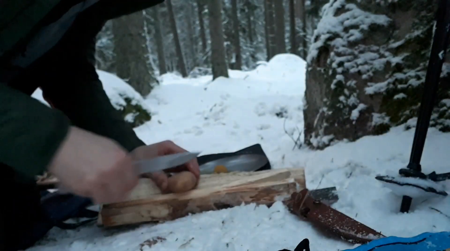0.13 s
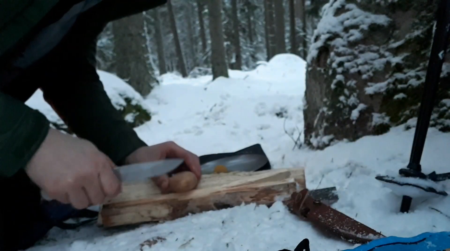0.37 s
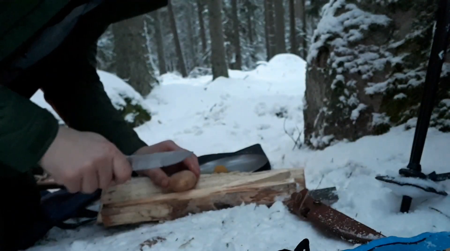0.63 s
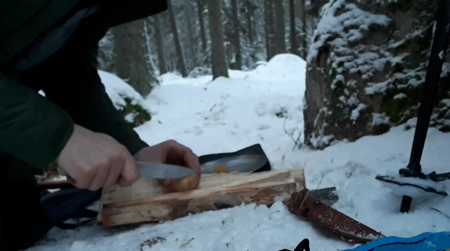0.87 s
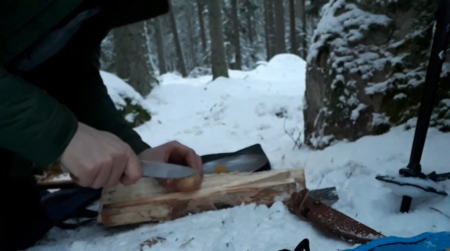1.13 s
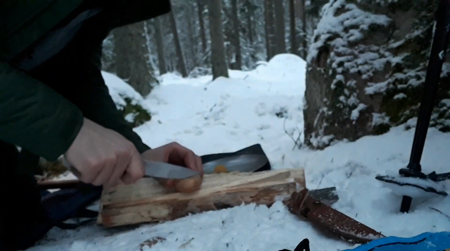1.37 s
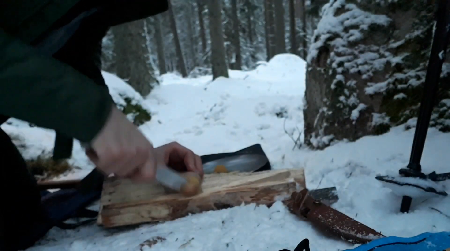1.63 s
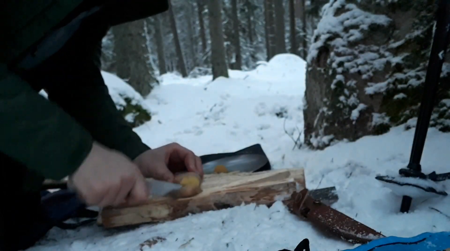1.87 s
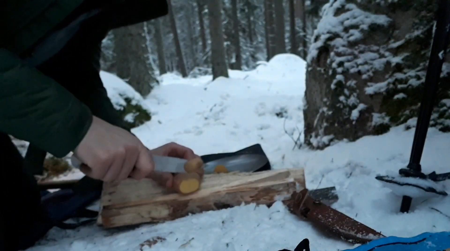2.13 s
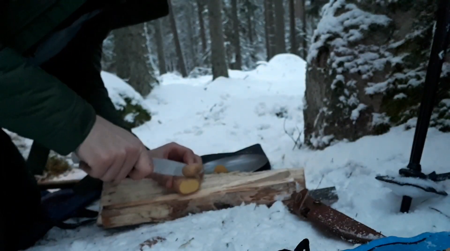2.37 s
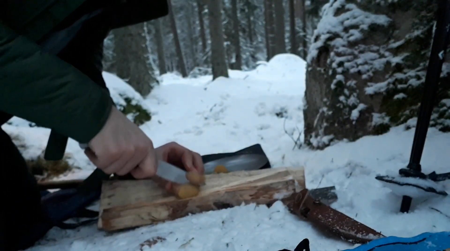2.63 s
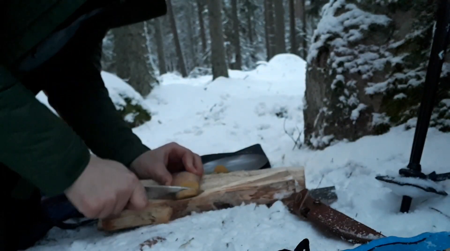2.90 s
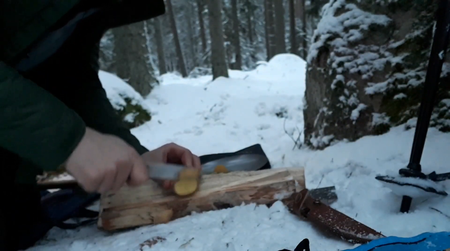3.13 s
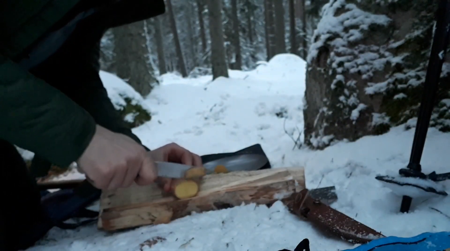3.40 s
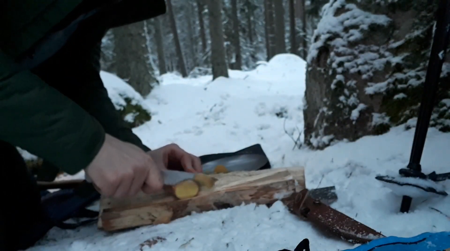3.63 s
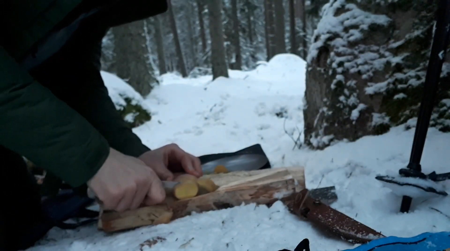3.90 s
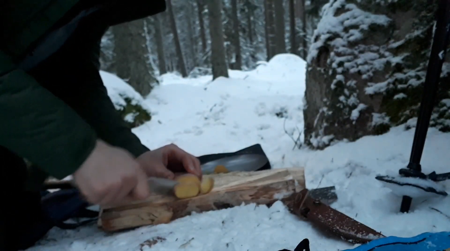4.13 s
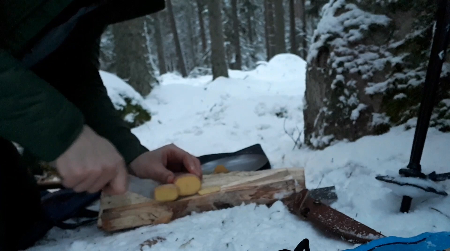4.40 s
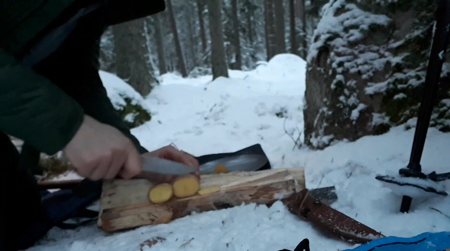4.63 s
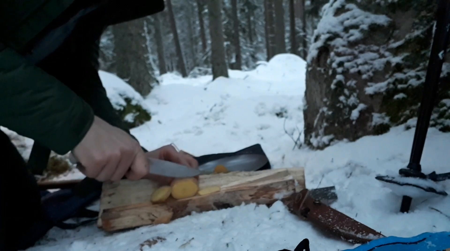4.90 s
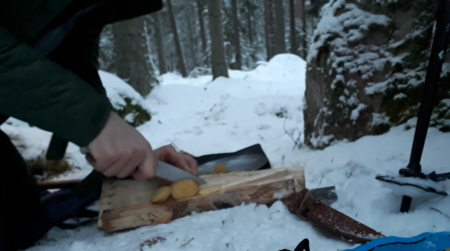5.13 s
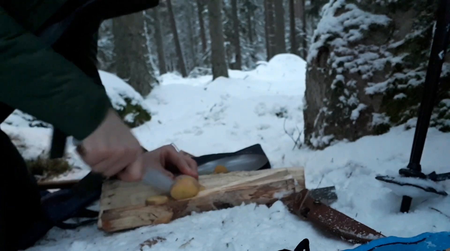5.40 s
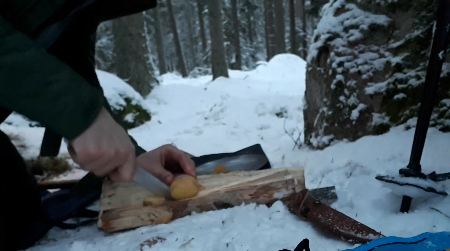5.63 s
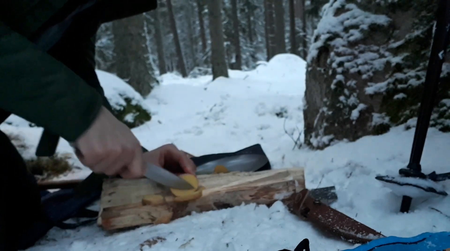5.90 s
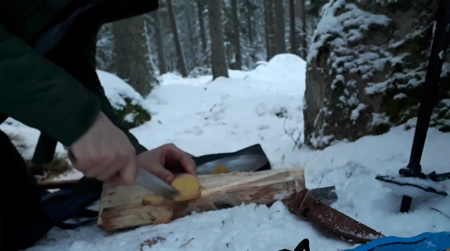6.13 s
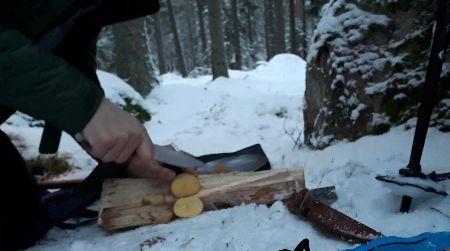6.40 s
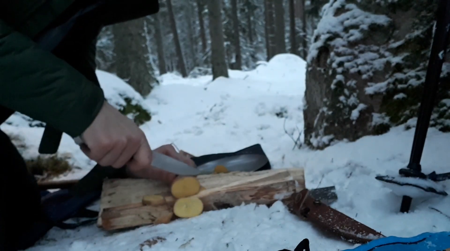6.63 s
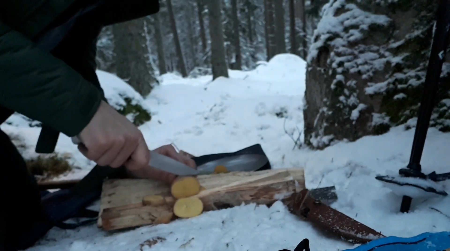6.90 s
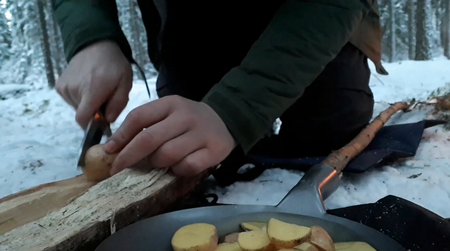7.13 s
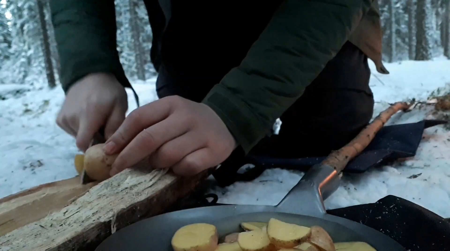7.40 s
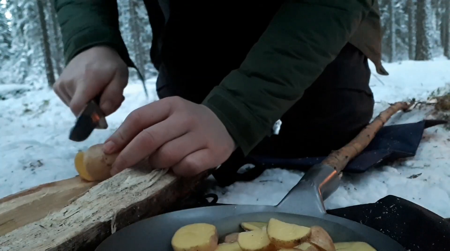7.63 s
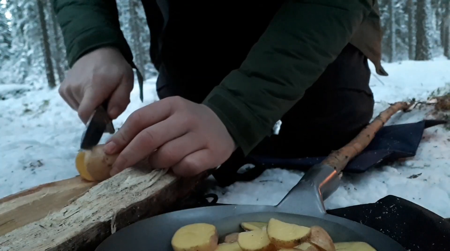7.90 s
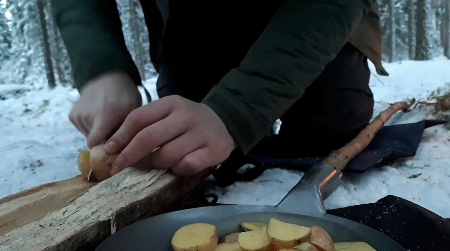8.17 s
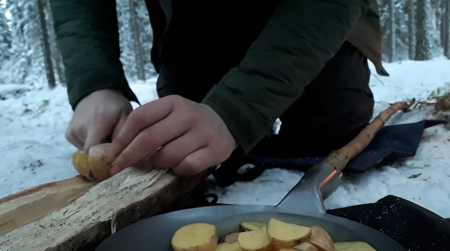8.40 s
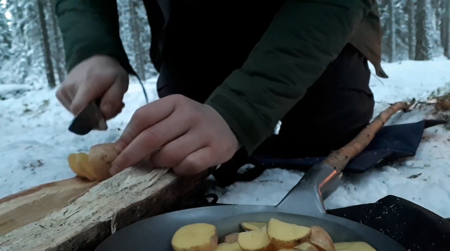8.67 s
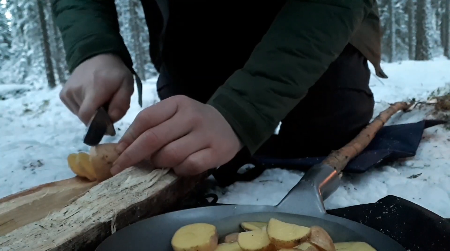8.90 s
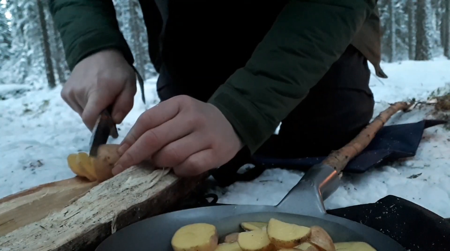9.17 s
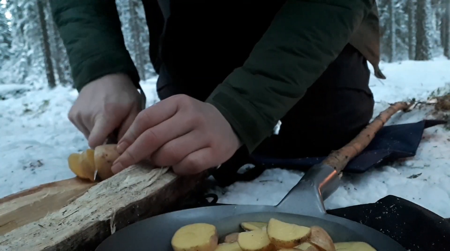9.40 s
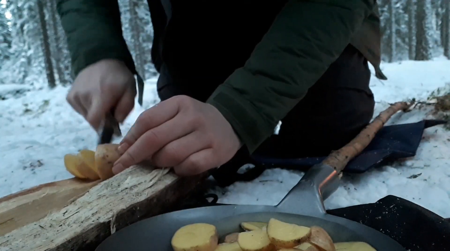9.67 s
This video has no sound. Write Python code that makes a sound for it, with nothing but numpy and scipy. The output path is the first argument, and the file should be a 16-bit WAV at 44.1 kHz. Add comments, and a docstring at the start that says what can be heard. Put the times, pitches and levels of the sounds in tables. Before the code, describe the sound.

A knife slices potatoes with wet crunches and sharp knocks on a split log outdoors, while a nearby wood fire pops, one crack very loud.

```python
"""A snowy forest: a knife slices potatoes on a split log; a wood fire pops and, from a nearer stand, hisses.
Wet cutting and a first sleeve rustle are grainy noise, edge ticks and fire pops are bursts ringing the open
port, knocks ring log modes. The left microphone port is open and hears all this through the air; the right
port is blocked: it hears mostly thuds and rumble, sums of ground modes, that come up through the ground into
the camera body. Low still air and a smooth microphone hiss lie under it all."""
import sys
import numpy as np
from scipy import signal
from scipy.fft import rfft, irfft
from scipy.io import wavfile
from scipy.ndimage import uniform_filter1d

SR = 44100
rng = np.random.default_rng(int(sys.argv[2]) if len(sys.argv) > 2 else 0)


def master_out(mix):
    """Clip the mix to full scale and print it as 16-bit PCM to the path in sys.argv[1]."""
    frames = np.transpose(np.atleast_2d(mix))
    ceiling = np.clip(frames, -1, 1)
    pcm = np.round(ceiling * 32767).astype(np.int16)
    wavfile.write(sys.argv[1], SR, pcm)


def how_loud(loudness_db):
    """Turn decibels into a plain amplitude multiplier (0 dB gives 1, 20 dB gives 10)."""
    steps = np.asarray(loudness_db, float) / 20
    return 10 ** steps


N = 431298
MOVE_S = 7.08  # the camera is set down nearer the fire

# modes of log, snow and camera stand, far stand:
# (f/Hz, relative level/dB, t60/s before damping, arrival/ms before slowness)
GROUND_FAR = [(77.7, -4, 0.152, 26.4), (106.1, 3, 0.11, 23.75), (156.1, 6.5, 0.065, 14.23),
              (216.5, -4, 0.049, 12.92), (540, -25, 0.038, 6.6)]


def evened(x):
    """Scales to rms 1."""
    return x / np.sqrt(np.mean(x ** 2) + 1e-20)


def read(points, hz):
    """Reads a spectrum on a log-frequency axis."""
    f, value = np.transpose(points)
    return np.interp(np.log(hz + 1), np.log(f + 1), value)


def add(mix, s, sound):
    """Adds a sound at time s."""
    part = mix[..., round(s * SR):][..., :sound.shape[-1]]
    part += sound[..., :part.shape[-1]]


def causal(x, gain):
    """Filters by a gain curve with minimum phase, via the folded cepstrum."""
    size = 2 * (len(gain) - 1)
    cepstrum = irfft(np.log(gain + 1e-5), size)
    cepstrum[1:size // 2] *= 2
    cepstrum[size // 2 + 1:] = 0
    return irfft(rfft(x, size) * np.exp(rfft(cepstrum)), size)


def port(hz):
    """Gain of the open port: the root of its summed resonances."""
    # port resonances: (f/Hz, width/Hz, level in the sum as 20 log/dB)
    resonances = [(1300, 1500, 5.5), (2810, 200, -3.5), (3850, 1700, 2), (5870, 1200, -3), (7600, 950, 2.5),
                  (9740, 770, -3.5), (12380, 1700, -1), (12900, 670, -8), (14300, 420, 2)]
    return np.sqrt(sum(how_loud(db) / (1 + (2 * (hz - f) / width) ** 2) for f, width, db in resonances))


def noise(gain, patchy_db, channels=1):
    """Random short-time spectra with a colour and drifting patches, at rms 1."""
    frames = N // 128 + 5
    a, b, patches = rng.standard_normal((frames, len(gain), channels, 3)).T
    patches = uniform_filter1d(patches, 14, axis=1)  # bins
    patches = evened(uniform_filter1d(patches, 12, axis=2))  # frames
    z = (a + 1j * b) * gain[:, None] * how_loud(patchy_db * patches)
    return evened(signal.istft(z, nperseg=512, noverlap=384)[1][:, :N])


def forest_air():
    """A low murmur of still air: coloured noise partly shared by both ports."""
    # still air: (f/Hz, relative level/dB)
    air_colour = [(20, -16), (50, -2.5), (100, 4.5), (160, -8.5), (260, -17.5), (500, -36)]
    level_db, same = -68, 0.42
    hz = np.fft.rfftfreq(N, 1 / SR)
    gain = how_loud(read(air_colour, hz)) * (hz < 1500)
    a, b = evened(irfft(rfft(rng.standard_normal((N, 2)).T) * gain, N))
    return how_loud(level_db) * np.array([a, same * a + np.sqrt(1 - same ** 2) * b])


def rumble():
    """Restless small pushes at random ring the low ground modes; their level follows the weight on the log."""
    # hands leaning on the log and steps of weight: (t/s, right port rms level/dB)
    weight = [(0.0, -62.5), (0.22, -74), (3.51, -67), (3.6, -56), (5.04, -74), (5.28, -43.5), (5.66, -77),
              (6.15, -55), (6.35, -86), (8.2, -52), (8.5, -70), (9.78, -57)]
    pushes_per_s, rise_s = 70, 0.015
    pushes = rng.standard_normal((N, 2)).T * (rng.random((N, 2)).T < pushes_per_s / SR)
    t = np.arange(8000) / SR
    ring = 0
    for hz, mode_db, t60, _ in GROUND_FAR[:4]:
        ring = ring + how_loud(mode_db - 60 * t / t60) * np.sin(2 * np.pi * hz * t)
    ring = ring * (1 - np.exp(-t / rise_s))
    a, b = evened(signal.fftconvolve(pushes, ring[None], axes=1)[:, :N])
    both = np.array([how_loud(-3.5) * (0.64 * b + 0.74 * a), b])
    s, db = np.transpose(weight)
    return both * how_loud(np.interp(np.arange(N) / SR, s, db))


def strokes():
    """Wet tearing of cells, after a sleeve rustle: grainy noise in three ranges that follow each stroke."""
    # the blade tears or drags; the first row is a sleeve rustle: (peak t/s, mid level/dB,
    # time to swell 20 dB/ms, time to fade 20 dB/ms, treble re mid/dB, wet low part re mid/dB)
    stroke_rows = [(0.11, -62, 150, 301.5, -1.5, 1), (1.523, -66.5, 2, 200, -6, 6),
                   (1.63, -61, 196, 100, 1.5, -8), (1.675, -44, 30, 28, 4, 2),
                   (1.7, -63, 60, 80, 1.5, 10.5), (1.75, -59.5, 100, 138.5, 0, -2),
                   (2.478, -76.5, 30, 400, 2, -7), (2.63, -61.5, 80, 40, -3, -9),
                   (2.65, -46, 16, 49, -5, -3), (2.682, -49, 58.5, 12.5, -0.5, -9),
                   (2.768, -45, 64, 45, -2.5, -9.5), (2.81, -69.5, 50, 300, -6, 2.5),
                   (3.65, -67, 152, 60, -3, -6), (3.686, -47.5, 31, 50, -2, -2.5),
                   (3.76, -46, 96, 44, -0.5, -6.5), (3.92, -62, 10, 45, 2.5, -9),
                   (4.01, -66, 300, 130, -4, -4.5), (4.186, -51.5, 57, 55, -4, -7),
                   (4.25, -71, 60, 1500, -6, -1), (5.074, -60, 10, 600, -6, -7),
                   (5.213, -53.5, 70, 74, 6, -17), (5.257, -48, 82, 21, -4, 3.5),
                   (5.366, -61.5, 69, 150, -4, -5), (5.46, -51.5, 34, 55, -2, -6.5),
                   (5.994, -54.5, 55, 61, -13, -5), (6.156, -56.5, 128, 60, -4, 1.5),
                   (7.234, -53.5, 127, 191, 3, -3), (7.317, -69, 60, 130, -6, -2),
                   (7.415, -72, 80, 60, -5, -8), (7.918, -67, 28, 900, -1, -3),
                   (8.125, -58, 96, 197, 1, -4.5), (8.178, -42.5, 45, 23, -1.5, -6),
                   (8.21, -61, 40, 258, 3.5, -0.5), (9.033, -59, 18, 35, -10, -2),
                   (9.076, -55, 9, 33, -8, 1), (9.123, -59.5, 39, 60, -2.5, -2.5),
                   (9.17, -68.5, 100, 600, -1.5, -3), (9.275, -52.5, 50, 100, 5, -12),
                   (9.307, -46, 60, 78, -2.5, -1), (9.478, -59, 55.5, 201.5, -2, -21),
                   (9.536, -55, 89, 97, -7, 1)]
    hz = np.fft.rfftfreq(512, 1 / SR)
    high = 1 / (1 + (9800 / (hz + 1)) ** 12)
    low = 1 / (1 + (hz / 4500) ** 8)
    low *= 1 + 1 / (1 + ((hz - 2750) / 300) ** 4)  # the blade rings near 2.75 kHz as it drags, standing out in the low range
    mid = np.maximum(1 - high - low, 0)
    bass_cut = 1 / (1 + (300 / (hz + 1)) ** 2)
    layers = [noise(port(hz) * bass_cut * share, patchy_db=4.0)[0] for share in (mid, high, low)]

    grain_db = 3.5 * evened(uniform_filter1d(rng.exponential(1, N) ** 2, 60))
    grain = evened(how_loud(grain_db))

    ms, power = np.arange(0, N, 32) * 1000 / SR, 0
    for s, db, swell_ms, fade_ms, treble_db, wet_db in stroke_rows:
        late = ms - s * 1000
        level_db = db - 20 * np.where(late < 0, -late / swell_ms, late / fade_ms)
        power = power + how_loud([level_db, level_db + treble_db, level_db + wet_db]) ** 2
    out = sum(np.repeat(np.sqrt(p), 32)[:N] * x for p, x in zip(power, layers))
    return out * grain


def knocks():
    """Each blow lands as one contact and a short uneven rattle that ring the log."""
    # the log knocks in the air: (t/s, peak level/dB)
    knock_rows = [(0.0918, -51), (1.5226, -45.0), (1.5951, -47), (1.6756, -38), (2.6486, -47),
                  (2.7702, -28.5), (3.6781, -41.5), (3.7681, -41.5), (3.7785, -33), (4.1891, -35.5),
                  (5.0745, -46), (5.2466, -23), (5.3614, -44), (5.4609, -41), (5.7255, -48), (5.9984, -37),
                  (6.1587, -58), (7.237, -29), (7.2984, -32.5), (7.9144, -46.5), (8.1819, -24.5),
                  (9.0752, -46.5), (9.1142, -48), (9.3058, -23), (9.5326, -40.5)]
    # log modes, detuned at random by each knock: (mean f/Hz, relative level/dB, t60/s)
    log_modes = [(242, -25, 0.016), (385, -4, 0.029), (554, 1, 0.01), (660, 4, 0.0061), (854, -12, 0.0079),
                 (1306, -3, 0.0099), (1620, -9, 0.019), (2920, -3, 0.012)]
    detune, rattle_db, rattle_decay_s = 0.079, -33.5, 0.015
    t, out = np.arange(3000) / SR, np.zeros(N)
    chance = rng.standard_normal((len(knock_rows), 1500 + len(log_modes)))
    for (s, db), draw in zip(knock_rows, chance):
        ring = 0
        for (hz, mode_db, t60), k in zip(log_modes, draw[1500:]):
            ring = ring + how_loud(mode_db - 60 * t / t60) * np.sin(2 * np.pi * hz * (1 + detune * k) * t)
        strike = how_loud(rattle_db) * draw[:1500] ** 3 * np.exp(-t[:1500] / rattle_decay_s)
        strike[24:36] += np.hanning(12) / 3  # the contact
        knock = signal.fftconvolve(ring, strike)
        add(out, s, -how_loud(db) * knock / abs(knock).max())
    return out


def thud(db, sharp_db, modes, slowness, turn, damping):
    """The ground spreads a blow: each mode swells up to its arrival, the low ones mostly later, and decays."""
    # sharp_db: tilt per octave; turn: phase in cycles
    t, ground = np.arange(12000) / SR, 0
    for hz, mode_db, t60, ms in modes:
        arrival_s = slowness * ms / 1000
        late = t - arrival_s
        swell = np.exp(-(np.minimum(late, 0) / (0.5 * arrival_s)) ** 2 * 1.095)
        level_db = mode_db + sharp_db * np.log2(hz / 140) - 60 * damping * np.maximum(late, 0) / t60
        ground = ground - swell * how_loud(level_db) * np.cos(2 * np.pi * (hz * late + turn))
    return ground * how_loud(db) / abs(ground).max()


def thuds():
    """Blows and shoves ring the ground modes: hard blows favour the high modes, soft hands the low ones."""
    # the blade lands on the log or bites the potato: (t/s, right port peak level/dB, left re right/dB)
    blows = [(0.0945, -30.5, -29), (1.5235, -36.5, 4.5), (1.537, -35, -9), (1.6749, -22.0, -20),
             (2.6434, -28.5, -18), (2.727, -35.5, -13), (2.7691, -17, -19), (3.6706, -36, -14),
             (3.7654, -21.5, -11.5), (4.189, -22.5, -22), (5.0744, -28, -8.5), (5.2442, -18.5, -27),
             (5.4552, -24.5, -6), (5.999, -34.5, -12), (6.1602, -22.5, -15.5), (7.2313, -28, -12.5),
             (7.2941, -41, -2), (8.1776, -29, 0), (9.0596, -53, 3), (9.117, -42, 2.5), (9.3016, -24, -9),
             (9.521, -38.5, -5)]
    # hands shove the log: (t/s, right port peak level/dB, left re right/dB)
    pushes = [(0.7327, -38, -25), (1.8448, -37.5, -19), (2.2921, -49.5, -15), (2.4836, -51, -7),
              (3.116, -41, -19), (3.433, -36.5, -14), (3.492, -36.5, -16), (4.023, -43.5, -24),
              (4.7943, -41.5, -14.0), (5.9081, -45.5, -15), (6.302, -48, -17), (7.7584, -40, -6),
              (8.891, -34.5, -10), (9.2, -44, 0.5), (9.243, -34, -4)]
    # modes of log, snow and camera stand, near stand:
    # (f/Hz, relative level/dB, t60/s before damping, arrival/ms before slowness)
    ground_near = [(65.5, -0.5, 0.16, 26.1), (125.6, 8, 0.1215, 27), (179, -1.5, 0.0256, 11.4),
                   (258, -1, 0.068, 13.44), (533, -9.5, 0.018, 9.6)]
    even_db, sharpen = -27.5, 0.78  # blow level without tilt; dB per octave for each dB above it
    push_sharp_db = -10.5  # per octave
    rows = [(*row, sharpen * (row[1] - even_db)) for row in blows]
    rows += [(*row, push_sharp_db) for row in pushes]
    out = np.zeros((2, N))
    for s, db, pan_db, sharp_db in rows:
        modes = GROUND_FAR if s < MOVE_S else ground_near
        left = thud(db + pan_db, sharp_db + 3.5, modes, slowness=0.399, turn=0.401, damping=1.08)
        right = thud(db, sharp_db, modes, slowness=0.928, turn=0, damping=0.86)
        add(out, s, np.array([left, right]))
    return out


def snaps(rows, length_ms, tails_db, echo_db, tail_ms, puff_db):
    """Short bursts ring the port, with a bounce off the snow, a faint tail and a low puff of air."""
    hz, ms, out = np.fft.rfftfreq(4096, 1 / SR), np.arange(3000) * 1000 / SR, np.zeros(N)
    chance = rng.standard_normal((len(rows), 2, 3000))
    puff = how_loud(puff_db) * np.sin(2 * np.pi * 0.172 * ms) * np.exp(-ms / 7)  # 172 Hz
    puff = np.pad(puff, (0, 1096))
    u = ms / length_ms
    for (s, db, treble_db, low_db, *_), tail_db, (a, b) in zip(rows, tails_db, chance):
        burst = a * u * np.exp(-u)
        burst[round(length_ms * SR / 1000)] += 2.0 / length_ms  # one crack stands out of the burst
        burst = burst + how_loud(echo_db) * np.roll(burst, round(SR / 1000))  # bounce after 1 ms
        tail = b * (1 - np.exp(-u)) * np.exp(-ms / tail_ms)
        burst = burst / np.linalg.norm(burst) + how_loud(tail_db) * tail / np.linalg.norm(tail)
        tilt = [(400, low_db + 0.5), (1100, low_db), (3300, low_db), (5600, 0.0024), (8500, 0),
                (11500, treble_db)]
        sound = causal(burst, port(hz) * how_loud(read(tilt, hz)))
        add(out, s, how_loud(db) * (sound / abs(sound).max() - puff))
    return out


def fire_pops():
    """Burning wood cracks: very short bursts, each with its own sputter after the crack."""
    # pops: (t/s, peak level before the puff/dB, treble/dB, low part/dB, sputter re burst/dB)
    pop_rows = [(0.592, -42, -26, -5, 7), (0.7047, -46.5, -8, -13, 2.5), (0.7215, -43.5, -9, -13, -2),
                (0.791, -29.5, 4, -22, 1), (1.122, -40.5, 5, -21, -2), (3.914, -30.5, 6, -14.5, 10),
                (7.5827, -22, -8, -15, -2), (7.6876, -43.5, -12, -30, 1.5), (8.3108, -29, 2, -42, -9.5),
                (9.0316, -37, -30, -20, -3), (9.0734, -40.5, -22, -10, 3), (9.509, -25.5, -13, -31, -13),
                (9.6713, -24, -5.5, -29, -8), (9.7225, -39, -14, -16, -1),
                (9.7519, -1, -22.5, -22.5, -13.5)]
    sputter_db = np.transpose(pop_rows)[-1]
    return snaps(pop_rows, 0.52, sputter_db, echo_db=-7, tail_ms=5.2, puff_db=-31)


def edge_ticks():
    """The edge ticks on skin and wood: bursts longer than the pops, with a shorter tail."""
    # ticks: (t/s, peak level before the puff/dB, treble/dB, low part/dB)
    tick_rows = [(1.5222, -41.5, 2, 7), (1.675, -24.5, 8.5, 2.5), (1.7128, -29.5, 4.5, -27),
                 (1.7434, -31.5, 5, -27), (2.4723, -51, -1.5, -13), (2.6479, -40, -6, -5),
                 (2.6588, -22.5, 2, -19), (2.6714, -31, -5, -13), (2.724, -39, -14, -21),
                 (2.77, -24, -21, -37), (3.681, -31, -22, -21), (3.7635, -34, -12, -9),
                 (4.1858, -31.5, -6, -15), (5.0694, -43, -2, -21), (5.248, -27, -23, 6),
                 (5.3613, -38.5, 2, -5.5), (5.4529, -30, -18, -27), (5.9957, -38, -28, -6),
                 (7.236, -46.5, -11, -13), (7.2958, -28.5, -7, -9), (7.9109, -47, -7, -12),
                 (8.1805, -26.5, -15, 15), (9.3013, -25, -1, -9), (9.5314, -44.5, -2.5, -14)]
    tails_db = np.full(len(tick_rows), 1.5)
    return snaps(tick_rows, 1.1, tails_db, echo_db=-10, tail_ms=2.7, puff_db=-42)


def embers():
    """Steam hisses out of the burning wood: coloured noise heard from the near stand."""
    # hiss: (f/Hz, relative level/dB)
    ember_colour = [(1500, -16), (3000, -12), (5500, -10), (7500, 5.5), (9000, -14), (13000, -2),
                    (16000, -12)]
    level_db, fade_in_s = -67.5, 0.018
    hz = np.fft.rfftfreq(512, 1 / SR)
    hiss = noise(how_loud(read(ember_colour, hz)) * (hz > 800), patchy_db=1.0)[0]
    return how_loud(level_db) * hiss * np.clip((np.arange(N) / SR - MOVE_S) / fade_in_s, 0, 1)


def scene():
    """The blocked port passes only the bass of what comes through the air."""
    airborne = strokes() + knocks() + fire_pops() + edge_ticks() + embers()
    muffled = signal.filtfilt(*signal.butter(2, 1000, fs=SR), airborne)
    muffled = np.roll(muffled, 12)  # samples late
    return np.array([airborne, how_loud(-0.5) * muffled]) + thuds() + rumble() + forest_air()


def roll_off(x):
    """The treble ends steeply here."""
    return signal.sosfilt(signal.butter(12, 16990, fs=SR, output="sos"), x)


def record(dry):
    """Each microphone thins the bass and adds its own smooth hiss."""
    # self-noise: (f/Hz, relative level/dB)
    hiss_colour = [(200, 2.5), (400, -3), (800, -7.5), (2000, -10.5), (6000, -17.5), (14200, -16),
                   (16500, -24)]
    hiss_db = -68.5
    hz = np.fft.rfftfreq(512, 1 / SR)
    hiss = noise(how_loud(read(hiss_colour, hz)) * (hz > 150), patchy_db=1.1, channels=2)
    thinned = signal.lfilter(*signal.butter(2, 45, "high", fs=SR), dry)  # the capsules lose the deepest bass
    return roll_off(thinned + how_loud(hiss_db) * hiss)


dry = scene()
out = record(dry)
master_out(out)
```